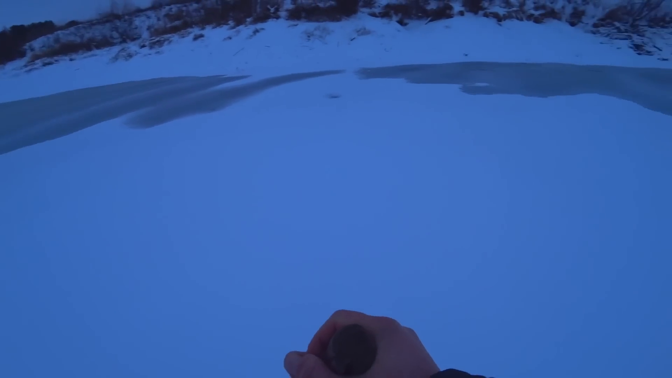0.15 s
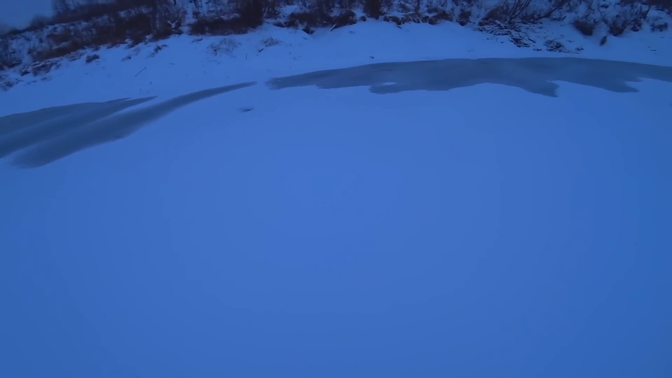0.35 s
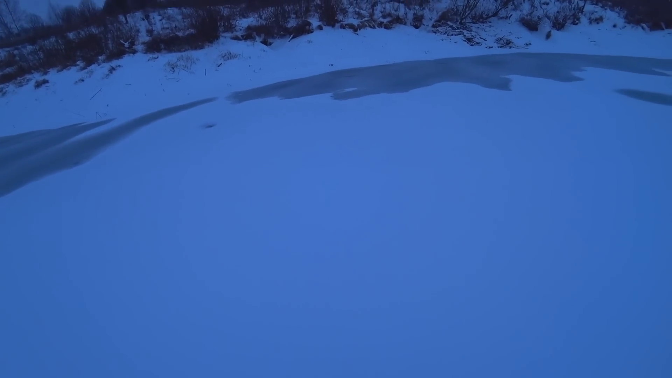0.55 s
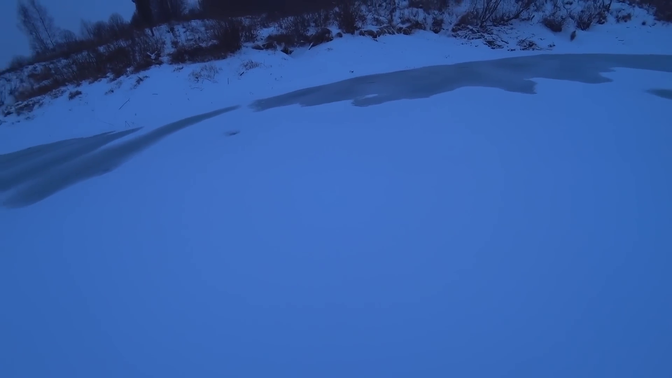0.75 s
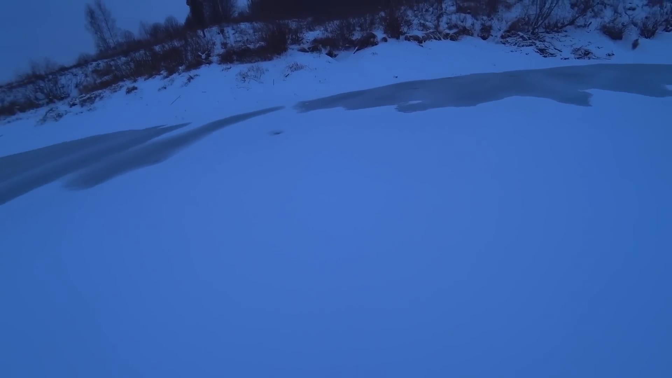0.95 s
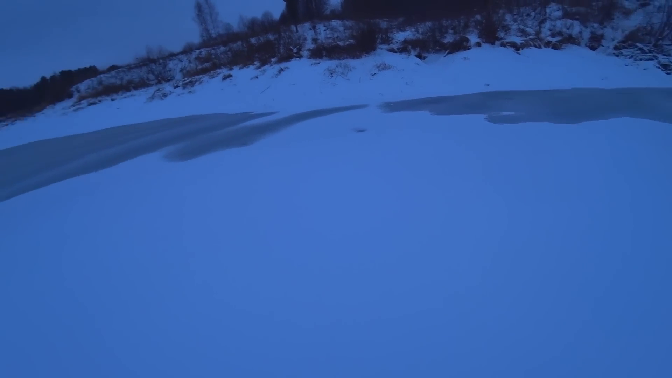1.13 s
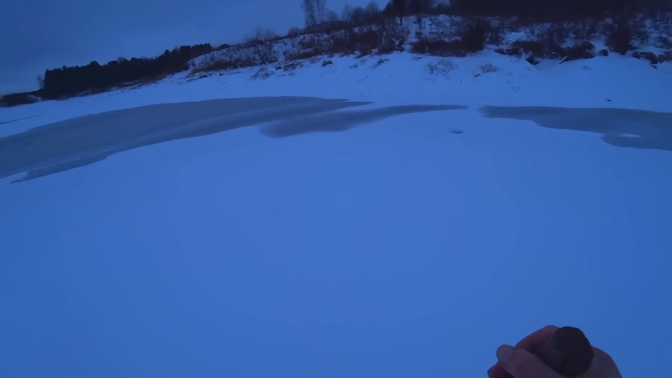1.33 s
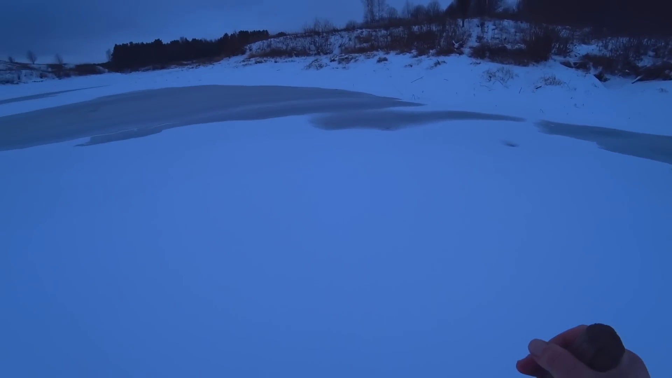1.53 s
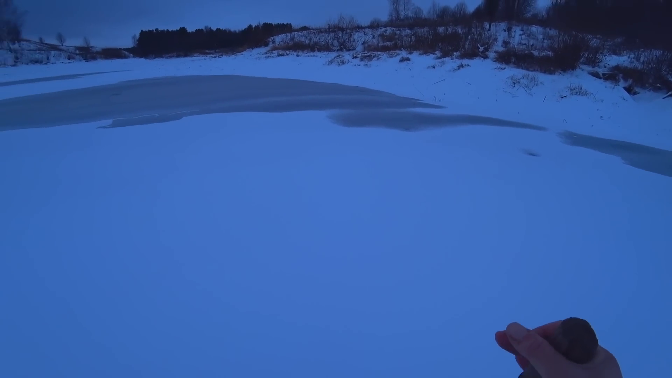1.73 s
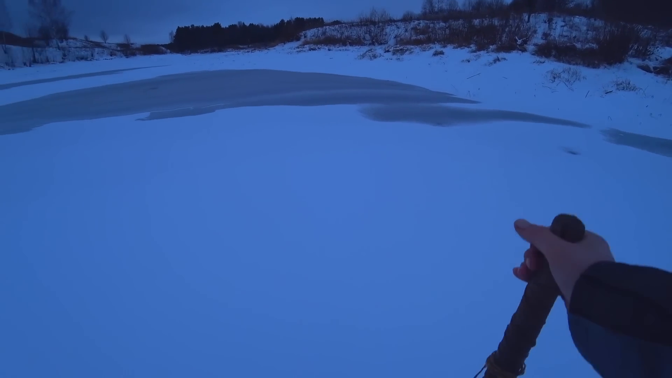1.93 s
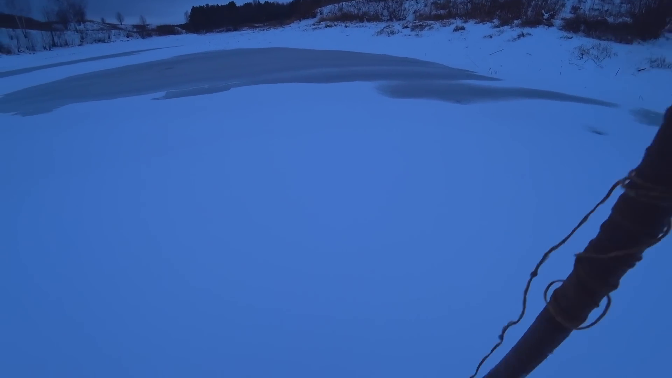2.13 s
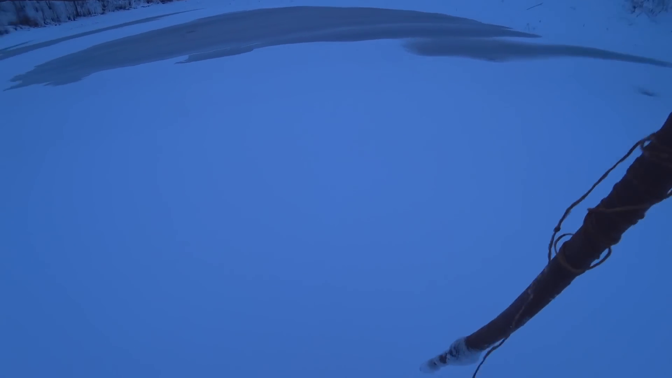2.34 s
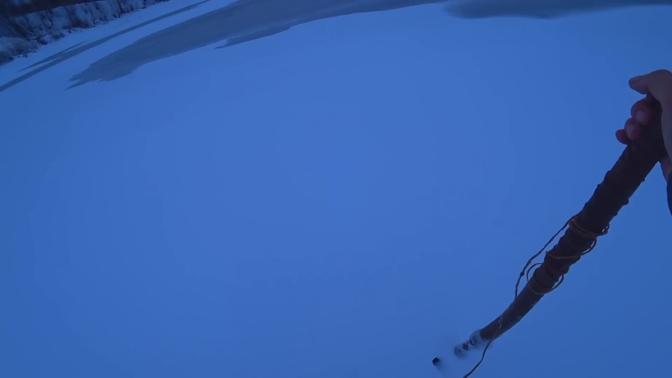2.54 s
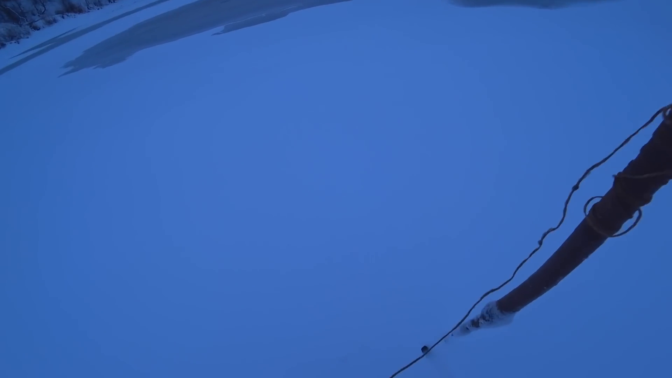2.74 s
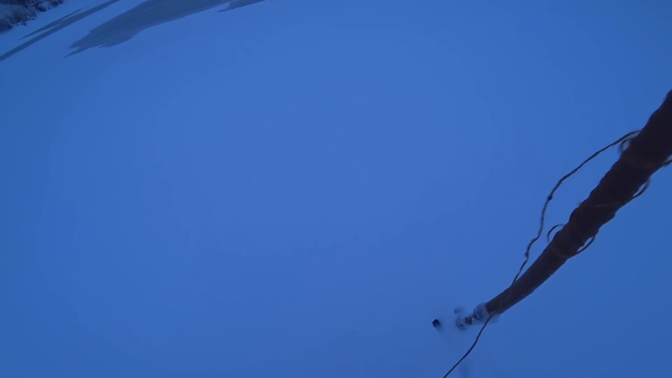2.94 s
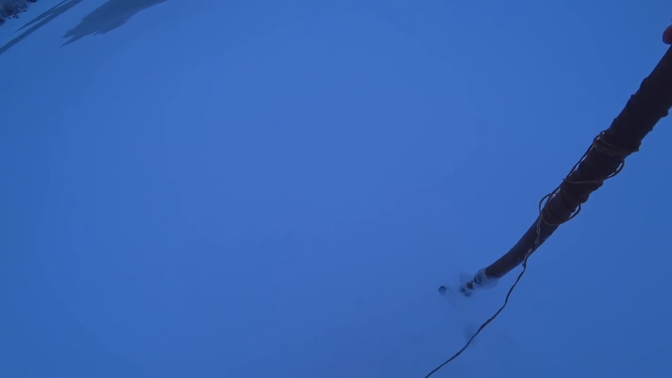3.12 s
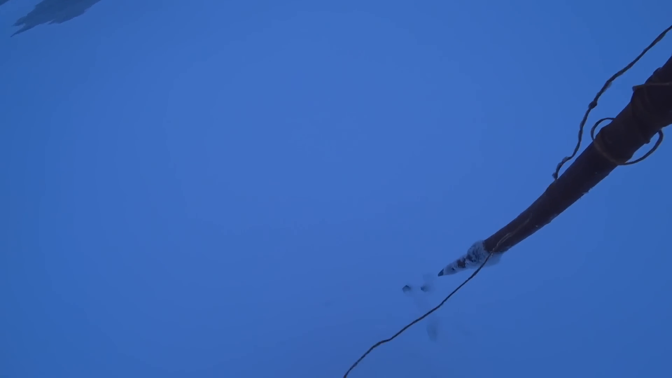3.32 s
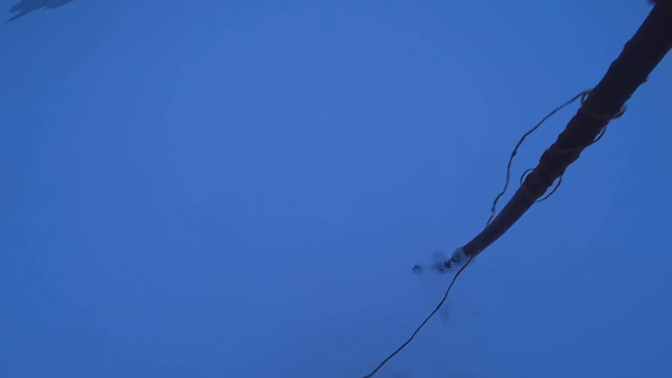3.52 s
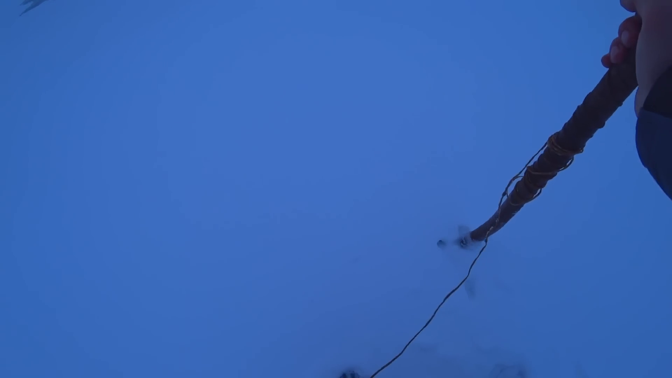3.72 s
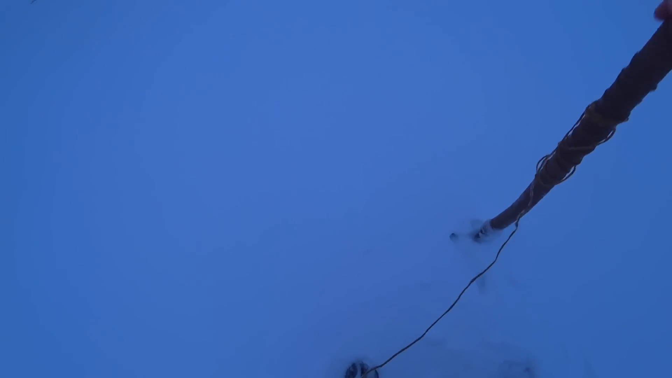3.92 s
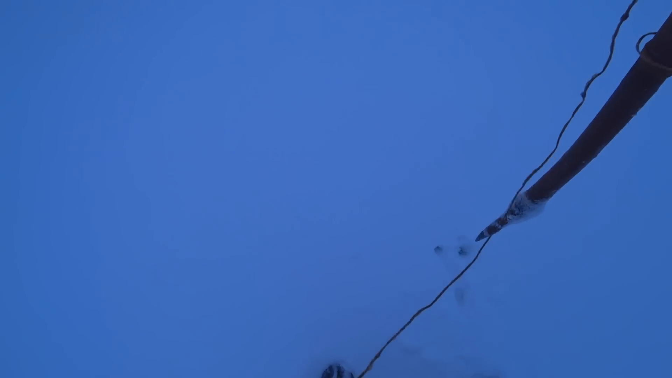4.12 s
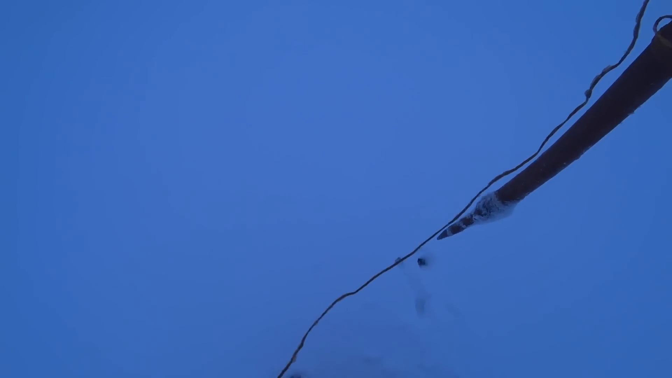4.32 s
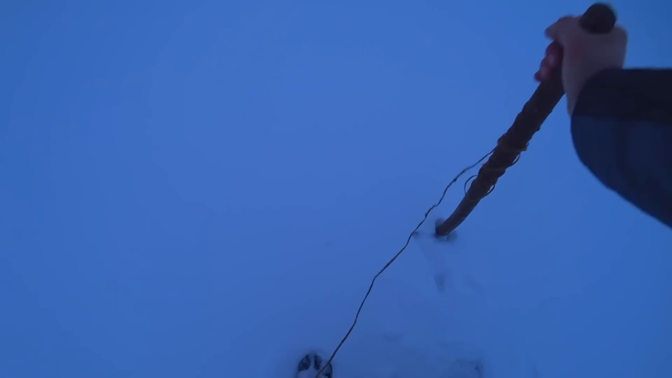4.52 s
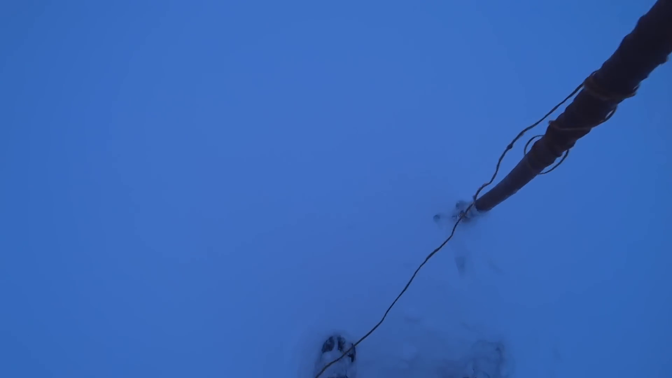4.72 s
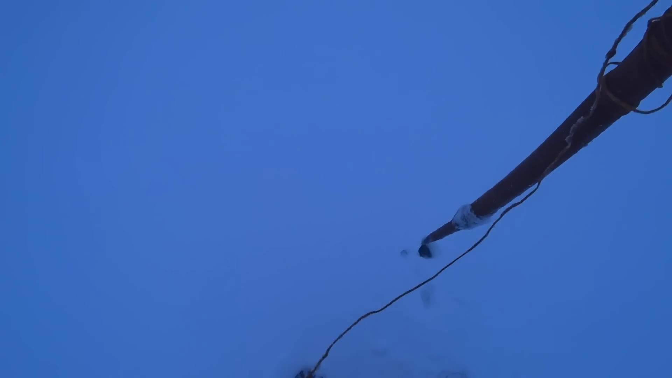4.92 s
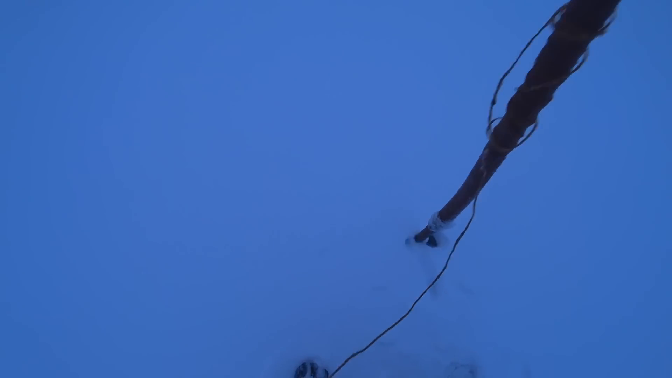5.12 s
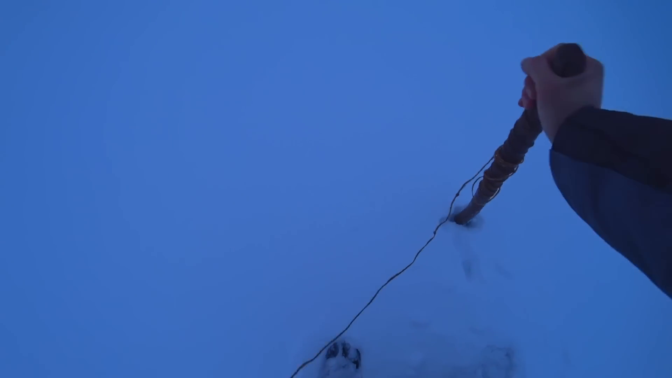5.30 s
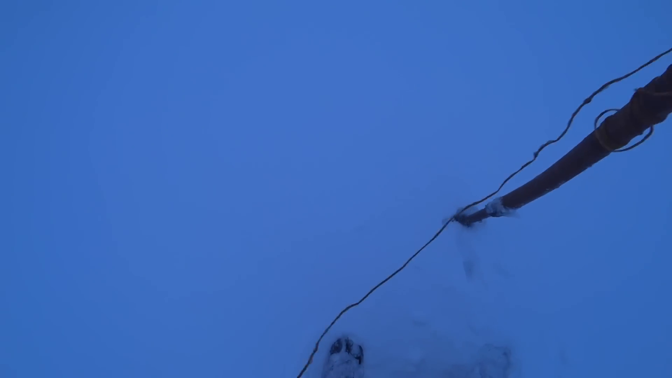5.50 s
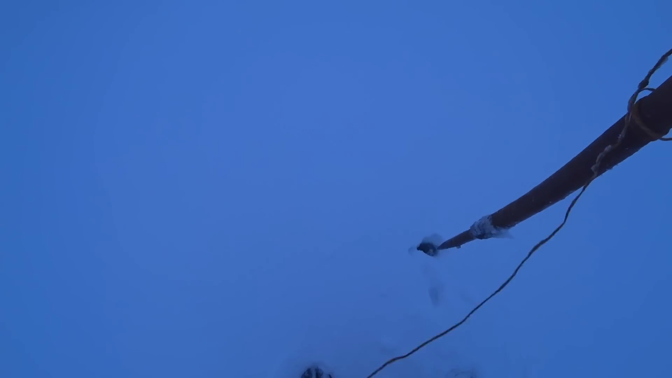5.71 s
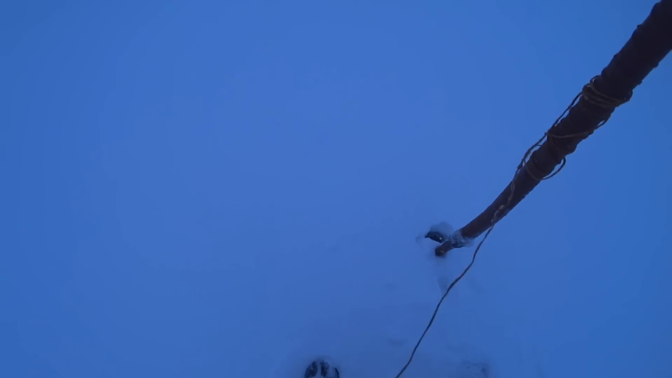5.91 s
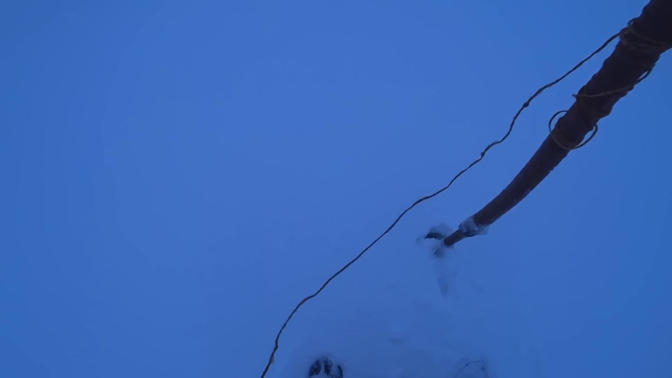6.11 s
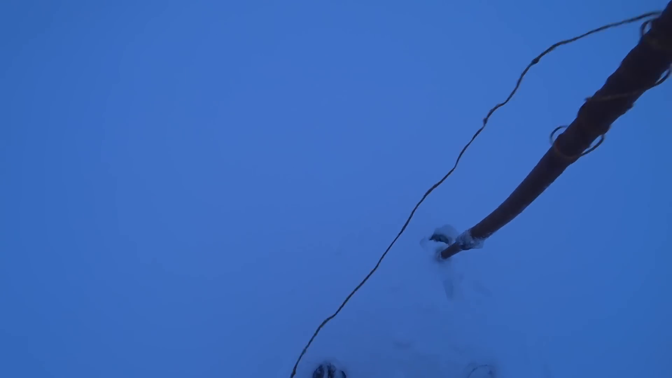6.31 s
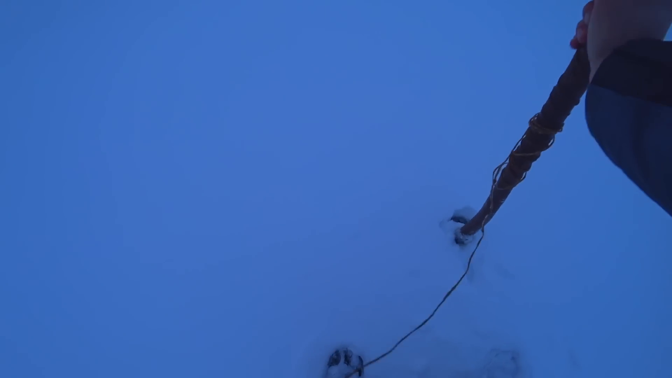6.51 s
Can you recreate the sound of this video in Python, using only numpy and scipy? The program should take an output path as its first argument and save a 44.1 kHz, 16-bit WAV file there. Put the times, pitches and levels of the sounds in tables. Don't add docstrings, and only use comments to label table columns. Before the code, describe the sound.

Close outdoor sound from a head-worn stereo microphone on a snowy frozen lake. Low lumpy wind gusts and quiet jacket rustle run throughout. At 0.36 s a short, hard, bright knock lands ahead with ringing chips. Until 2.4 s there is only cloth movement, dull bumps, a few ticks, and faint wavering whistles from a swinging cord at about 0.05, 0.6, 0.8 and 1.1 s. A loud crack comes at 2.47 s, to the right, then a longer, softer crunching contact at 3.0 and a sharp strike with gritty grinding at 3.56. Slush pops and faint rasps follow near 3.75-4.0. At 4.5 a woody, knocking bite crunches; small scrapes follow at 4.7. The loudest crack hits at 5.18, with a sleeve swish and a rasping catch at 5.47. A fuller thud falls at 5.88, and a deep final blow at 6.37 crunches away.

```python
import sys
import numpy as np
from scipy import signal
from scipy.fft import rfft, irfft, next_fast_len
from scipy.io import wavfile
from scipy.ndimage import uniform_filter1d, map_coordinates

SR = 44100
rng = np.random.default_rng(int(sys.argv[2]) if len(sys.argv) > 2 else 0)


def boost(x):
    u = np.asarray(x, float) / 20
    return 10 ** u


def store_pcm(level_fs):
    pcm = np.round(np.clip(level_fs, -1, 1) * 32767).astype(np.int16)
    wavfile.write(sys.argv[1], SR, np.atleast_2d(pcm).T)


N = 289005

# t/s, peak level/dB, knock level/dB, thud level/dB, contact time/s
BLOWS = [
    (0.358, -9.5, -7, -19.5, 0.0032),
    (2.4659, -5, -15, -20, 0.014),
    (2.996, -7.5, -18, -16, 0.063),
    (3.5572, -4.5, -12.5, -29, 0.015),
    (4.4978, -7, -4, -18.5, 0.023),
    (5.1776, -2.5, -13.5, -24, 0.014),
    (5.8766, -5, -11.5, -16, 0.011),
    (6.3694, -5.5, -12, -15.5, 0.018),
]
# f/Hz, level/dB per Hz
GRIT = [(590, -23), (1000, -12), (1090, 0), (1460, -14), (2040, -7.5), (3210, -12), (3550, -12),
        (10600, -26.5), (11200, -21), (11500, -39), (15000, -83.5), (22000, -120)]
STROKE_FADE_S, STROKE_LEAD_S = 0.0075, 0.0031
PAN = np.array([[.5], [-.5]])


def unit(x):
    return x / np.sqrt(np.mean(x ** 2) + 1e-20)


def along(points, hz):
    f, v = np.transpose(points)
    return np.interp(np.log(hz + 1), np.log(f + 1), v)


def curves(rows):
    s, *cols = np.transpose(rows)
    return [np.interp(np.arange(N) / SR, s, c) for c in cols]


def wobble(rate):
    knots = rng.standard_normal(int(N * rate / SR) + 4)
    return map_coordinates(knots, [np.arange(N) * rate / SR])


def filtered(x, response):
    m = next_fast_len(N + 8192)
    return irfft(rfft(x, m) * response(np.fft.rfftfreq(m, 1 / SR)), m)[..., :N]


def band(hz, lo_hz, hi_hz):
    return 1 / np.sqrt((1 + (lo_hz / (hz + 1)) ** 6) * (1 + (hz / hi_hz) ** 6))


def steady(x, span):
    return x / np.sqrt(np.abs(uniform_filter1d(x ** 2, int(span * SR))) + 1e-6)


def patchy(x, patchy_db, size, order):
    z = signal.stft(x, nperseg=size)[2]
    field = uniform_filter1d(rng.standard_normal(z.shape[-2:]), size=4, axis=0)
    field = uniform_filter1d(field, size=order, axis=1)
    return signal.istft(z * boost(patchy_db * unit(field)), nperseg=size)[1][..., :N]


def crumbly(spectrum, crumb_db):
    crumbs = patchy(rng.standard_normal(N), crumb_db, size=128, order=2)
    return unit(filtered(crumbs, lambda hz: boost(along(spectrum, hz))))


def pushes(rows, cycles, gain_db):
    out, t = np.zeros((2, N + SR)), np.arange(SR // 15) / SR
    for s, db, hz, *pan_db in rows:
        u = t * hz / cycles
        push = u * np.exp(-u) * np.sin(2 * np.pi * hz * t + rng.uniform(0, 2 * np.pi))
        out[:, round(s * SR):][:, :len(t)] += boost(db + gain_db + sum(pan_db) * PAN) * push
    return out[:, :N]


def snaps(rows, base_t60):
    out, t = np.zeros((2, N + SR)), np.arange(SR // 30) / SR
    for s, db, hz, pan_db in rows:
        draw = rng.standard_normal((3, len(t)))
        t60 = base_t60 * (2500 / hz) ** 0.32
        noise = draw[0] + .5 * draw[1:]
        snap = noise * boost(-60 * t / t60) * np.clip(t / 0.0003, 0, 1)
        ring = signal.lfilter(*signal.iirpeak(hz, 2.5, SR), snap) + .04 * snap
        out[:, round(s * SR):][:, :len(t)] += boost(db + pan_db * PAN) * ring / np.abs(ring).max()
    return out[:, :N]


def rush(spectrum, patchy_db):
    # f/Hz, correlation
    likeness = [(60, 0.95), (130, 0.86), (270, 0.83), (580, 0.32), (1230, 0.036), (2600, 0.13),
                (5540, 0.27), (11800, 0.1)]
    pair = patchy(rng.standard_normal((2, N)), patchy_db, size=512, order=6)

    def mid_side(hz):
        angle = np.arccos(np.clip(along(likeness, hz), -1, 1)) / 2
        return boost(along(spectrum, hz)) * [np.cos(angle), np.sin(angle)]

    mid, side = filtered(pair, mid_side)
    return unit(np.array([mid + side, mid - side]))


def wind():
    # t/s, level/dB
    gusts = [(0, -64), (.25, -69), (.38, -44.5), (.66, -66.5), (.88, -47.5), (1.11, -63), (1.45, -46.5),
             (1.9, -49), (2.06, -54), (2.22, -54), (2.9, -63), (3.6, -58), (4.2, -66), (4.63, -56),
             (5.1, -64.5), (5.31, -49), (5.67, -65.5), (6.35, -49.5)]
    # f/Hz, level/dB per Hz
    rumble = [(7.1, -34), (12, -2.5), (32, -0.5), (97, -16), (150, -41), (200, -30), (330, -120)]
    gust_db, = curves(gusts)
    return boost(gust_db + 0.5) * unit(boost(3.3 * wobble(13)) * rush(rumble, patchy_db=2.5))


def moving():
    # t/s, half length/s, sleeve hiss level/dB, cloth rustle level/dB
    moves = [(0.149, 0.097, -49.5, -56), (0.643, 0.078, -55, -61), (1.003, 0.071, -54, -59),
             (1.115, 0.1, -57, -56), (1.448, 0.31, -89, -57.5), (1.915, 0.14, -56.5, -55),
             (2.218, 0.13, -56, -54), (2.448, 0.13, -52.5, -53.5), (3.07, 0.3, -58, -57.5),
             (3.59, 0.12, -51.5, -48.5), (4.004, 0.2, -54.5, -52), (4.253, 0.077, -54.5, -63),
             (4.573, 0.14, -50, -51.5), (4.82, 0.079, -54, -55.5), (5.242, 0.069, -40, -50),
             (5.342, 0.15, -51, -57), (5.503, 0.12, -56, -55.5), (5.998, 0.15, -53.5, -55.5),
             (6.437, 0.077, -49, -46.5)]
    linger = 1.17
    t = np.arange(0, N / SR + .01, .005)
    s, half, *levels = np.transpose(moves)[:, :, None]
    bell = np.exp(-((t - s) / (half * np.where(t > s, linger, 1))) ** 2)
    gains = []
    for db, rest_db in zip(levels, (-61, -60)):
        power = boost(2 * rest_db) + (boost(2 * db) * bell ** 2).sum(0)
        gains.append(np.interp(np.arange(N) / SR, t, np.sqrt(power)))
    return gains


def clothes():
    # f/Hz, level/dB per Hz
    cloth = [(53, -38), (90, -6.5), (330, -5.5), (410, -7.5), (548, -7.5), (1090, -12), (1600, -17.5),
             (2080, -29), (3520, -120)]
    # f/Hz, level/dB per Hz
    sleeve = [(590, -9), (1000, -2), (1240, -0.5), (1770, -3.5), (2010, -3), (3520, -5.5), (5330, -9.5),
              (8420, -10.5), (10500, -15), (11300, -12.5), (14700, -63), (22000, -120)]
    hiss, rustle = moving()
    stir = unit(boost(1.8 * wobble(70)) * rush(cloth, patchy_db=1.5))
    sweep = unit(boost(1.0 * wobble(25)) * rush(sleeve, patchy_db=1.5))
    return boost(3.0) * rustle * stir + boost(2.36) * hiss * sweep


def around():
    # f/Hz, left-right level/dB
    lean = [(60, -1.5), (220, 1.5), (840, 0.9), (3140, -2.5), (11800, -5)]
    return filtered(wind() + clothes(), lambda hz: boost(along(lean, hz) * PAN))


def cord():
    # t/s, length/s, level/dB, f/Hz, glide as a share of pitch
    swings = [
        (.05, 0.15, -48, 292, 0.11),
        (.6, 0.095, -54.5, 527, 0.17),
        (0.8, 0.07, -56.5, 378, -0.13),
        (1.085, 0.077, -52, 505, -0.06),
    ]
    waver, flutter_db, out = 1 + 0.0089 * wobble(60.0), 0.89 * wobble(39.6), np.zeros(N)
    for s, length, db, hz, glide in swings:
        u = np.linspace(-1, 1, int(length * SR))
        now = slice(round(s * SR), round(s * SR) + len(u))
        slow = np.abs(u) ** 3.8
        sag = 0.307 * slow * (length / 0.15) ** 2
        pitch = hz * (1 + glide * u) * (1 - sag) * waver[now]
        fade = np.clip((1 - np.abs(u)) * length / .026, 0, 1)
        loudness = boost(db + 2 - 11 * slow + flutter_db[now])
        out[now] += fade * loudness * np.sin(2 * np.pi * np.cumsum(pitch) / SR)
    return out


def bumps():
    # t/s, peak level/dB, f/Hz
    mount_bumps = [(0.537, -35, 249), (0.563, -31, 350), (1.056, -41.5, 254), (1.208, -37.5, 290),
                   (1.225, -27, 334), (1.229, -36, 75), (1.389, -37.5, 328), (1.401, -36, 294),
                   (1.475, -34.5, 192), (1.507, -32.5, 166), (2.088, -42, 291), (2.125, -31.5, 280),
                   (2.218, -35.5, 230), (2.291, -38, 357), (3.423, -38.5, 304), (3.47, -38, 167),
                   (3.758, -36, 353), (3.934, -32.5, 180), (3.988, -30, 200), (3.993, -28.5, 332),
                   (4.132, -43, 226), (4.432, -33, 196), (4.592, -26, 260), (4.851, -35, 347),
                   (5.303, -26, 160), (5.522, -43, 283), (5.584, -40, 390)]
    return pushes(mount_bumps, cycles=0.37, gain_db=9.5)


def pops():
    # t/s, peak level/dB, f/Hz, left-right level/dB
    slush_pops = [(0.4025, -35, 900, -2), (0.935, -38, 1180, -14), (1.227, -34.5, 585, 3),
                  (1.476, -31.5, 550, 3.0), (1.509, -38, 719, 6), (1.938, -32, 770, -1),
                  (2.181, -32, 627, -1), (2.611, -34, 547, 0.0), (2.848, -37, 764, -3),
                  (2.923, -34.5, 1350, 13), (2.94, -29.5, 1090, -8), (2.967, -30, 810, 5),
                  (3.135, -34.5, 563, 2), (3.216, -30, 905, -4), (3.659, -32.5, 506, 9),
                  (3.802, -23.5, 960, -4.5), (3.82, -36, 934, -2.0), (4.042, -31, 695, -1.0),
                  (4.053, -32.5, 850, -4), (4.639, -28, 630, -0.5), (4.672, -29.5, 664, 0),
                  (4.726, -30, 705, 1), (4.81, -36.5, 721, 0.0), (5.115, -39, 1100, -6),
                  (5.397, -38, 622, -1), (5.434, -25, 760, -1), (5.504, -36, 630, 3),
                  (5.679, -42.5, 1390, -12), (5.836, -38.5, 510, 0), (6.024, -27, 1010, -5), ]
    return pushes(slush_pops, cycles=0.28, gain_db=11.5)


def ticks():
    # t/s, peak level/dB, f/Hz, left-right level/dB
    taps = [(0.4014, -38, 5040, -9), (0.9345, -34, 5200, 3), (0.9345, -27, 13000, 0), (1.236, -41, 2510, 5),
            (2.6015, -35, 6260, -12), (2.6114, -40, 2110, -7), (2.6256, -39, 5130, -12),
            (2.9231, -35, 2500, 3), (2.967, -35, 3210, -8), (3.1286, -39.5, 2600, -9),
            (3.7575, -38, 2520, 5), (5.0569, -37.5, 2890, -5), (5.0998, -47, 2166, 0),
            (5.5034, -33.5, 7990, -4.0), (5.6628, -39, 5300, -8), (5.8004, -39, 7500, -8),
            (5.8096, -48, 2790, -4.0), (5.8348, -33, 3200, -12), (6.0397, -37.5, 2150, -11)]
    return snaps(taps, base_t60=0.011)


def pings():
    # t/s, peak level/dB, f/Hz, left-right level/dB
    pieces = [(.3611, -17, 3750, -2), (.3612, -18, 2600, -2), (.3612, -23, 5000, -2), (.9345, -27, 8000, 1),
              (.9355, -35, 720, 0), (.9355, -36, 1160, -4), (1.2925, -38, 8100, 0), (1.2925, -37, 1300, 0),
              (1.302, -39, 1200, 0), (3.6655, -33, 6000, 6), (3.666, -36, 8200, 6), (4.665, -36, 800, 0),
              (4.679, -42, 1500, 0), (4.7245, -32, 1900, -4), (4.731, -36, 900, 0), (4.794, -42, 7800, -4),
              (5.1815, -21, 560, 0), (5.835, -36, 4300, -10), (5.882, -20, 1600, -3)]
    return pushes(pieces, cycles=1.6, gain_db=9)


def chips():
    # t/s, peak level/dB, f/Hz, left-right level/dB
    fragments = [
        (2.4671, -13, 3200, -6),
        (2.467, -26, 7200, -6),
        (.3592, -15.5, 5800, 0),
        (.382, -36, 3500, 0),
        (3.6655, -25, 3000, 7),
        (3.68, -35, 2940, 5),
        (4.6603, -34.5, 1800, -5.0),
    ]
    return snaps(fragments, base_t60=0.012)


def ringing(spike_db):
    # f/Hz, width/Hz, level/dB
    tip_modes = [(716, 130, 0), (1113, 120, 6.5), (1760, 120, -2), (2050, 79, 2), (2690, 180, 3),
                 (3253, 210, -2), (4370, 470, -5.5), (6060, 3000, -14.5)]
    rubs = patchy(rng.standard_normal(N) * boost(spike_db * wobble(400)), 4.5, size=256, order=5)

    def response(f):
        total = 0
        for k, (c, w, db) in enumerate(tip_modes):
            mode = 1j * f * w / (c * c - f * f + 1j * f * w)
            total = total + (-1) ** k * boost(db) * mode
        return total

    return unit(filtered(rubs, response))


def strokes(start, length, level_db, sag_db):
    out = np.zeros(N + SR)
    for s, span, db, sag in zip(start, length, level_db, sag_db):
        t = np.arange(int((span + STROKE_LEAD_S) * SR)) / SR - STROKE_LEAD_S
        fade = np.clip(np.minimum(t + STROKE_LEAD_S, span - t) / STROKE_FADE_S, 0, 1)
        gain = fade * boost(db - sag * np.clip(t / span, 0, 1))
        out[round((s - STROKE_LEAD_S) * SR):][:len(t)] += gain
    return out[:N]


def scrape():
    # t/s, length/s, level/dB, rasp f/Hz, sag/dB
    pulls = [
        (3.745, 0.053, -55, 2454, 2),
        (3.797, 0.049, -52, 2240, 1),
        (3.895, 0.019, -47, 2270, 8),
        (3.93, 0.093, -45.5, 2580, 4),
        (4.718, .014, -42, 1825, 0),
        (4.741, 0.029, -46.5, 3160, -2),
        (4.784, 0.0428, -53, 2510, -7),
        (5.47, 0.029, -34.5, 2857, 3.5),
    ]
    s, length, db, pitch, sag_db = np.transpose(pulls)
    stroke = np.searchsorted(s - STROKE_LEAD_S, np.arange(N) / SR) - 1
    hz = pitch[np.clip(stroke, 0, None)]
    rough = unit(filtered(rng.standard_normal(N), lambda f: band(f, 0, 340)))
    rasp = rough * np.sin(2 * np.pi * np.cumsum(hz) / SR)
    rub = boost(2.4 * wobble(300)) * (rasp + 0.77 * crumbly(GRIT, 4.6))
    return strokes(s, length, db, sag_db) * steady(rub, span=0.017)


def grind():
    # t/s, length/s, grit level/dB, slush level/dB, sag/dB
    slips = [(0.38, 0.023, -42.5, -40.5, 11), (2.484, 0.015, -34, -22.5, 24), (2.489, .065, -49, -47, 14),
             (2.982, .014, -41, -46, -6), (3.006, 0.034, -25, -30.5, 4.5), (3.037, 0.054, -40.5, -50, 12),
             (3.571, 0.091, -19.5, -26.5, 23.5), (4.485, .015, -44, -45.5, -7),
             (4.513, 0.036, -17, -34.5, 24.5), (4.547, 0.051, -36, -39.5, -4), (4.595, 0.034, -38, -33, 28),
             (5.171, 0.014, -39, -46, -22), (5.193, 0.047, -19.5, -26, 22),
             (5.242, 0.0636, -45.5, -49, -9.5), (5.299, 0.041, -32.5, -30.5, 30),
             (5.884, 0.057, -30, -38, 8.5), (5.926, 0.048, -40, -54, 21), (6.361, .011, -46, -46, -8),
             (6.383, 0.026, -24.5, -30, 2.5), (6.405, .14, -23, -32, 36.5)]
    # f/Hz, level/dB per Hz
    wet_snow = [(47, -44), (80, -10.5), (441, -6.5), (714, -4), (926, -11.5), (1080, -17), (1460, -20),
                (1800, -8.5), (2340, -28), (3960, -120)]
    s, length, grit_db, slush_db, sag_db = np.transpose(slips)
    grit = strokes(s, length, grit_db, sag_db)
    slush = strokes(s, length, slush_db, sag_db)
    clumps = wobble(260)
    crunch = steady(boost(1.6 * clumps) * (crumbly(GRIT, 3.5) + 2.8 * ringing(spike_db=3)), span=.025)
    squelch = steady(boost(2.2 * clumps) * crumbly(wet_snow, 4.6), span=0.0196)
    return grit * boost(-3) * crunch + slush * squelch


def breaking():
    # t/s, peak level/dB, f/Hz
    fractures = [(0.3594, -12.5, 2330), (0.3596, -17, 7680), (0.3598, -13, 3780), (0.3602, -16, 1260),
                 (0.361, -27, 610), (0.363, -17.5, 1400), (2.4687, -9.0, 3740), (2.4697, -16.0, 1840),
                 (2.4702, -20.0, 760), (2.4708, -11, 3350), (2.4711, -24, 5670), (2.4742, -19.0, 3410),
                 (2.4748, -17.5, 900), (2.4786, -16, 4180), (2.9974, -8, 3330), (2.9989, -11.0, 3410),
                 (3.0006, -11, 3780), (3.0026, -22.0, 3410), (3.005, -18.0, 3410), (3.0074, -19.0, 3410),
                 (3.0099, -20, 2790), (3.5571, -17, 4630), (3.559, -12, 2280), (3.5621, -17, 1240),
                 (3.5622, -14, 5120), (3.5623, -9, 3090), (3.564, -13.0, 3100), (3.5644, -20.5, 740),
                 (3.5675, -14, 2550), (4.4979, -11, 3090), (4.4986, -15.5, 745), (4.5006, -17, 1860),
                 (4.5019, -15, 3780), (4.5032, -14.0, 2040), (4.5039, -11.0, 3380), (4.5073, -12, 3090),
                 (4.5097, -18, 3090), (5.1784, -13.0, 5120), (5.1795, -16, 2060), (5.18, -20, 6940),
                 (5.1814, -15, 606), (5.1819, -9.0, 2280), (5.1821, -14.5, 4630), (5.184, -13, 2060),
                 (5.1876, -14, 2520), (5.8786, -15.5, 2790), (5.8787, -12, 4700), (5.8803, -24, 7680),
                 (5.8817, -18, 3100), (5.8826, -19, 1860), (5.8854, -20, 3070), (5.8854, -18.5, 674),
                 (6.3711, -17, 2770), (6.3724, -18, 5670), (6.3726, -15.5, 1125), (6.3728, -24, 670),
                 (6.3738, -14.5, 2280), (6.375, -26, 3780), (6.3806, -20, 3780), (6.3809, -17, 2060)]
    # t/s, peak level/dB, f/Hz
    crushed = [(3.0123, -23, 2790), (3.0188, -25.0, 2790), (3.0228, -23, 2790), (3.0264, -26, 673),
               (3.0304, -24.0, 4630), (3.0307, -26.0, 2060), (3.5765, -16.0, 2500), (3.5861, -26, 666),
               (3.5931, -27, 3090), (3.5993, -19, 2790), (3.608, -17.5, 2520), (3.6152, -26.0, 3090),
               (3.6246, -32.0, 2790), (3.6277, -35, 1130), (3.6287, -31, 2280), (3.6447, -40, 2520),
               (4.5222, -19, 4180), (4.5261, -20, 2800), (4.5325, -29.0, 1240), (4.533, -33, 3090),
               (4.5475, -34, 610), (4.5595, -29, 3090), (4.5614, -30.0, 750), (4.5677, -30.0, 3090),
               (4.5804, -25.5, 1860), (4.5813, -30, 3090), (4.6054, -39, 545), (5.2004, -21, 2300),
               (5.2047, -16, 1880), (5.2149, -21.0, 5570), (5.2187, -25, 2520), (5.2514, -33.0, 1680),
               (5.2645, -32.0, 4180), (5.2789, -29, 6940), (5.296, -31.0, 452), (5.2976, -26.5, 1860),
               (5.3001, -31, 4180), (5.3088, -33.0, 2500), (5.4717, -31.0, 2790), (5.4771, -22.5, 2520),
               (5.4814, -22.5, 2790), (5.4877, -24.5, 3090), (5.492, -41, 2530), (5.8908, -26, 663),
               (5.9085, -29.0, 820), (5.915, -27, 2280), (5.928, -26.0, 2280), (6.3899, -21.0, 2280),
               (6.3954, -20, 1110), (6.403, -23, 1240), (6.4117, -23.0, 4630), (6.4132, -21.0, 2790),
               (6.4174, -22, 2790), (6.4252, -23, 2280), (6.4374, -22, 2240), (6.4397, -25, 1120),
               (6.4465, -30.0, 1020), (6.4571, -29, 1860), (6.4625, -31, 1240), (6.4897, -38.0, 1230)]
    return (pushes(fractures, cycles=0.74, gain_db=10.5) + pushes(crushed, cycles=1.7, gain_db=7.5))[0]


def give():
    s, db, knock_db, *_ = np.transpose(BLOWS)
    rows = np.transpose([s + 0.0018, db + knock_db - 10, 0 * s + 260])
    return pushes(rows, cycles=0.36, gain_db=9.0)


def contact(noise, column_db, late, rise, t60, release):
    out, t = np.zeros(N + SR), np.arange(-SR // 100, SR // 8) / SR
    for (s, *_, length), db in zip(BLOWS, column_db):
        whisper = boost(-39 + 700 * min(length, .02) + 3000 * np.minimum(t, 0))
        swell = np.clip((t - late) / rise, 0, 1) ** 2 + whisper
        fall_db = 60 * np.abs(t) / t60 + 60 * np.clip(t - length - late, 0, 1) / release
        start = round((s + t[0]) * SR)
        burst = swell * boost(-fall_db) * noise[start:][:len(t)]
        out[start:][:len(t)] = boost(db) * burst / np.abs(burst).max()
    return out[:N]


def blows():
    # f/Hz, level/dB per Hz
    crack = [(59, -49), (100, -17), (686, 11.5), (1430, -19), (1740, 1), (2210, -7.5), (3290, -10),
             (3780, -10.5), (8370, -12.5), (10800, -24.5), (11500, -23), (15000, -67), (22000, -120)]
    thud_spectrum = [(70, -20.0), (110, -14.5), (190, 6.5), (320, -8.5), (600, -4.5), (900, -28.5)]
    s, db, knock_db, thud_db, _ = np.transpose(BLOWS)
    shatter = crumbly(crack, 2.4) + 0.45 * ringing(spike_db=0.5)

    def strand(lo_hz, hi_hz):
        return steady(filtered(shatter, lambda hz: band(hz, lo_hz, hi_hz)), span=0.0074)

    splinters = contact(strand(3400, 13440), db + .5 * knock_db - 6.5, 0, 0.0011, 0.042, 0.012)
    sheet = contact(strand(1800, 4820), db - 8, 0, 0.00176, 0.07, 0.012)
    pole = contact(strand(820, 1470), db + knock_db - 2.0, 0.00065, 0.0036, 0.086, 0.034)
    thud = contact(crumbly(thud_spectrum, 0.64), db + thud_db + 4.0, 0.0038, 0.00595, 0.13, 0.3)
    jolt = pushes(np.transpose([s + .006, db + thud_db, 0 * s + 65]), cycles=.45, gain_db=-5)[0]
    return splinters + sheet + pole + thud + jolt


def at_ports(x, scatter_db):
    # f/Hz, left-right level/dB
    shade = [(60, 3), (130, 0), (270, 0.5), (580, 3.5), (1230, -2.0), (2600, -6), (5540, -9), (11800, -3.5)]
    # f/Hz, left lead/rad
    lead = [(150, -0.058), (500, -0.24), (1400, -0.95), (2400, -0.54), (3800, -0.8), (9000, -0.98)]
    t = np.arange(SR // 100) / SR
    echoes = np.diff(rng.standard_normal((2, len(t))) * boost(-60 * t / 0.0068))
    echoes = echoes / np.linalg.norm(echoes[0])
    near = x + boost(scatter_db) * signal.oaconvolve(x[None], echoes, axes=1)[:, :N]
    return filtered(near, lambda hz: boost(along(shade, hz) * PAN) * np.exp(1j * along(lead, hz) * PAN))


def scene():
    ahead_db = 5 * (np.arange(N) < SR) * PAN
    pole = at_ports(blows() + breaking() + grind() + scrape(), scatter_db=-10.5) * boost(ahead_db)
    small = chips() + ticks() + pops() + bumps() + pings()
    return around() + cord() + small + give() + pole


def top_cut(x):
    return signal.sosfilt(signal.butter(12, 12370, fs=SR, output="sos"), x)


def record(dry):
    rounded = dry / (1 + np.abs(dry / .95) ** 6) ** (1 / 6)

    def limit(hz):
        leak = boost(-26.5) / (1 + (hz / 12900) ** 40)
        return 1 / (1 + (hz / 10990) ** 90) + leak

    return top_cut(filtered(rounded, limit))


dry = scene()
out = record(dry)
store_pcm(out)
```